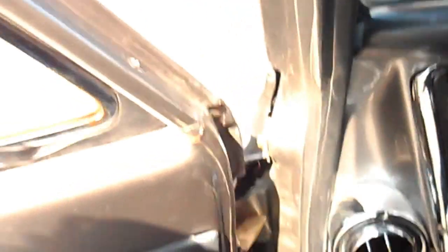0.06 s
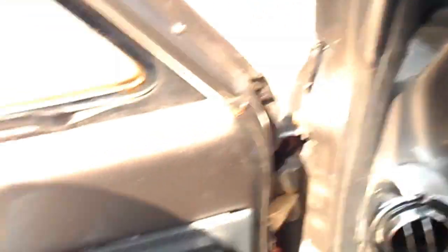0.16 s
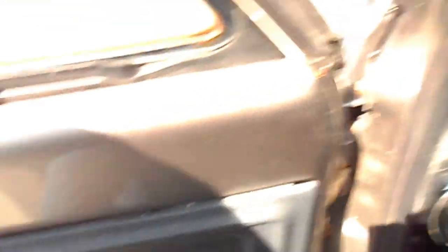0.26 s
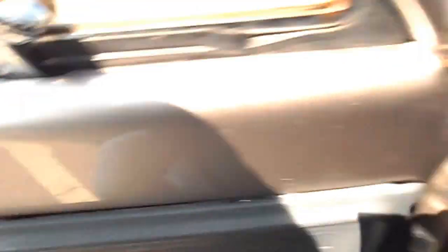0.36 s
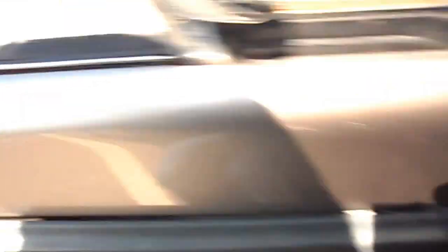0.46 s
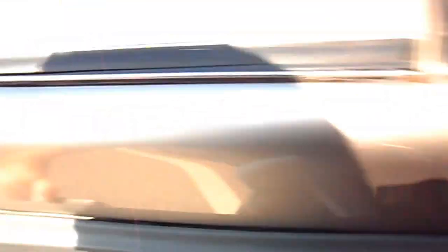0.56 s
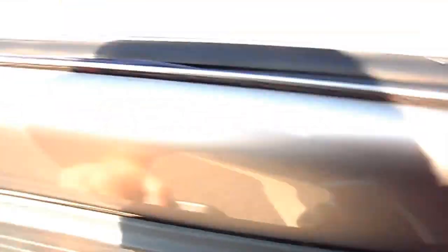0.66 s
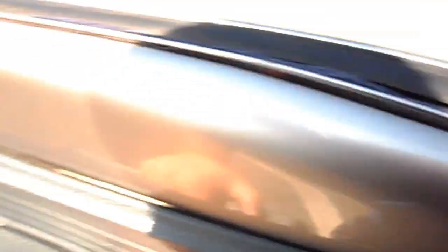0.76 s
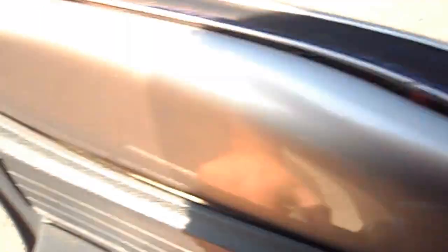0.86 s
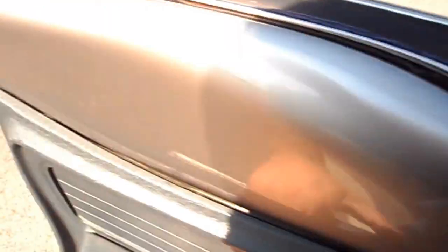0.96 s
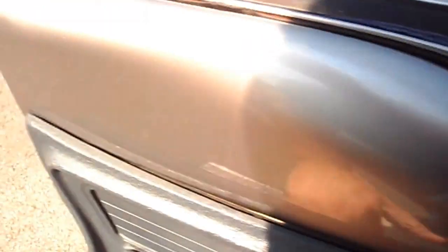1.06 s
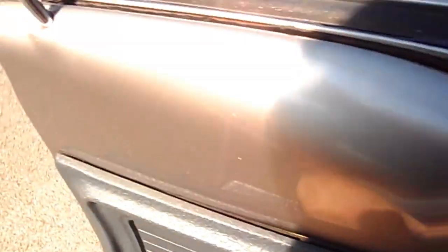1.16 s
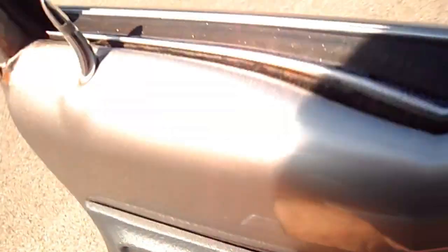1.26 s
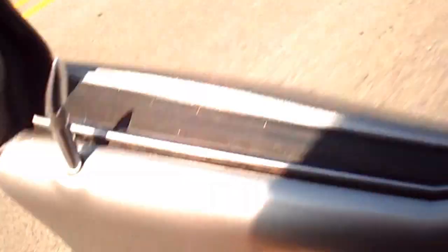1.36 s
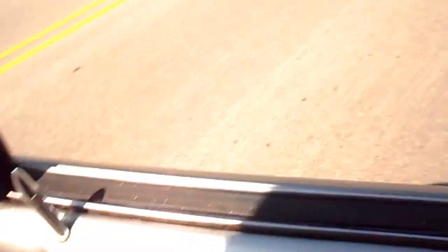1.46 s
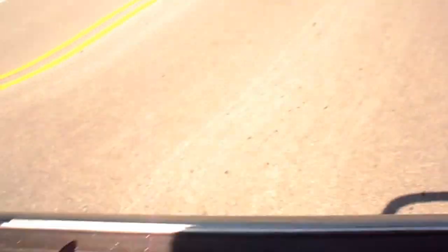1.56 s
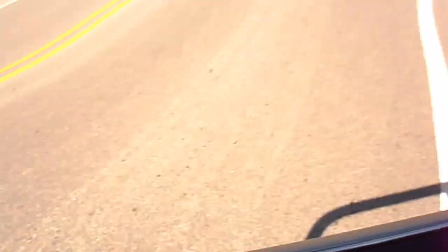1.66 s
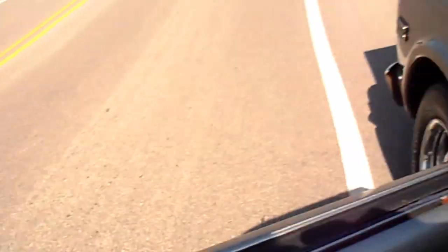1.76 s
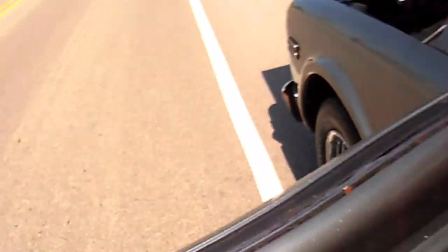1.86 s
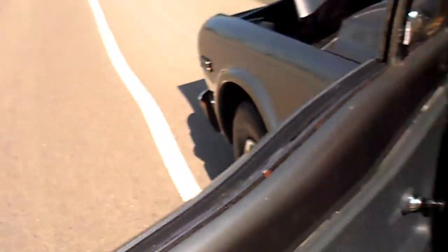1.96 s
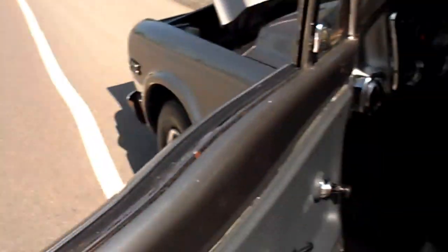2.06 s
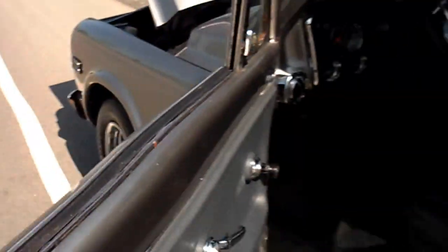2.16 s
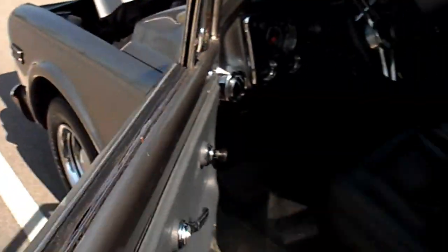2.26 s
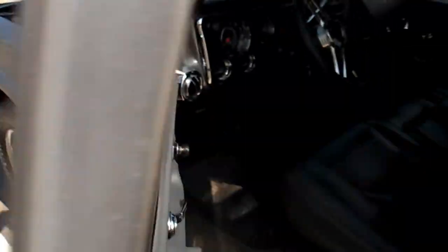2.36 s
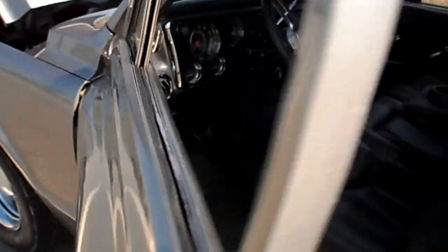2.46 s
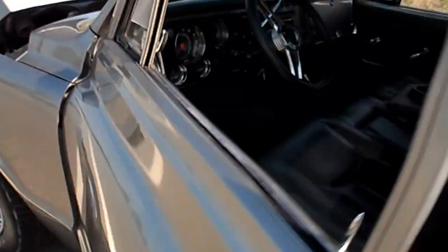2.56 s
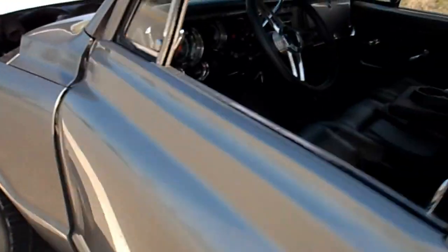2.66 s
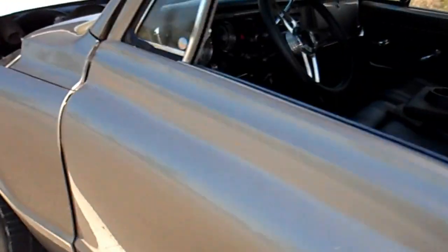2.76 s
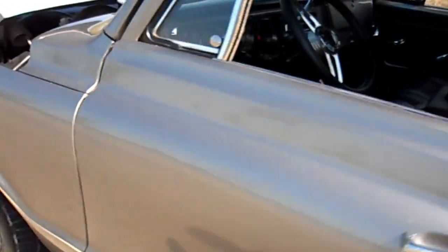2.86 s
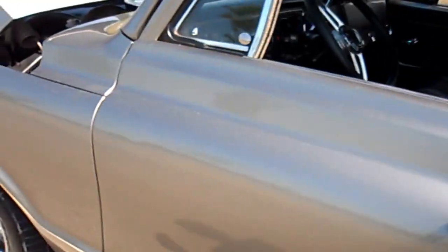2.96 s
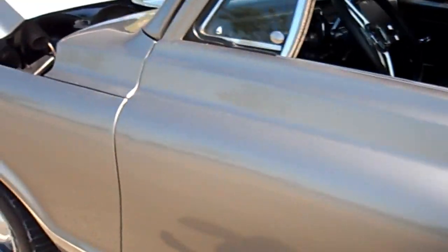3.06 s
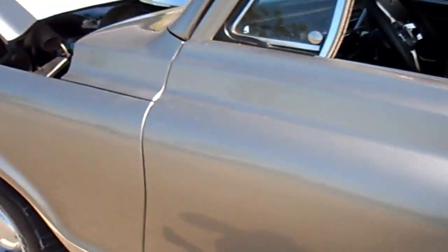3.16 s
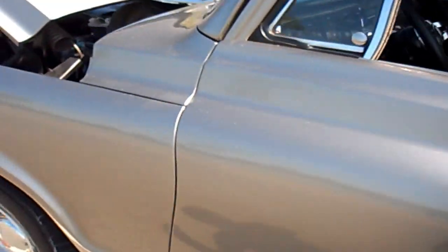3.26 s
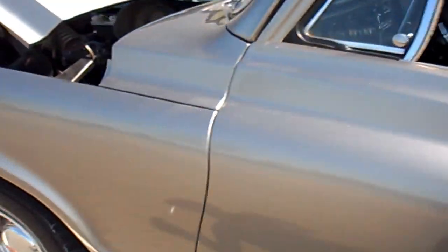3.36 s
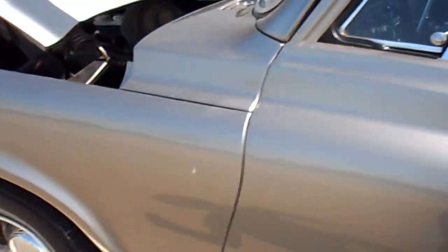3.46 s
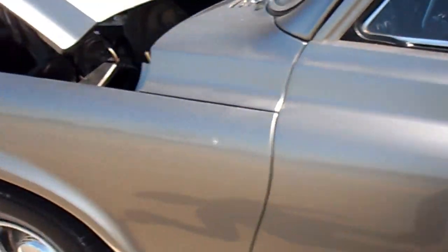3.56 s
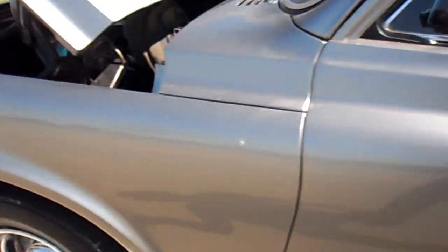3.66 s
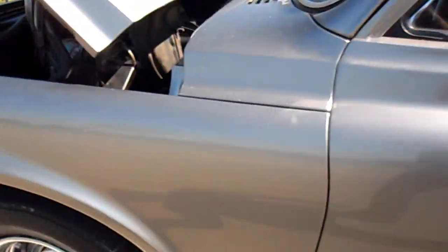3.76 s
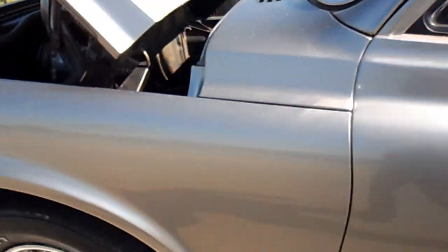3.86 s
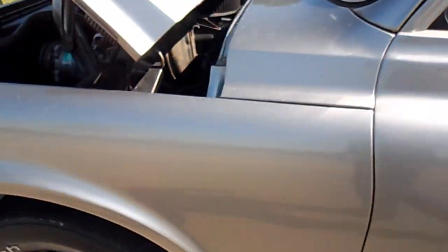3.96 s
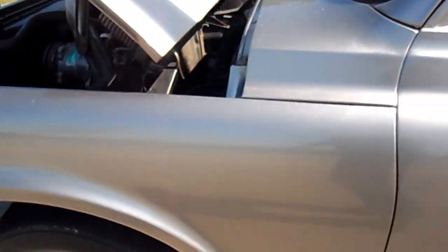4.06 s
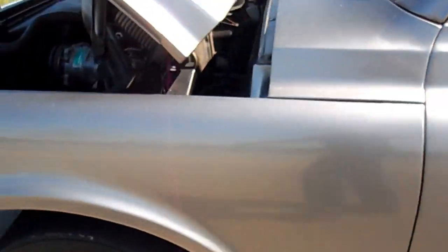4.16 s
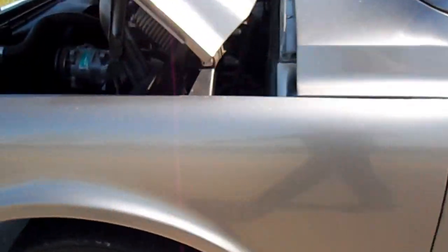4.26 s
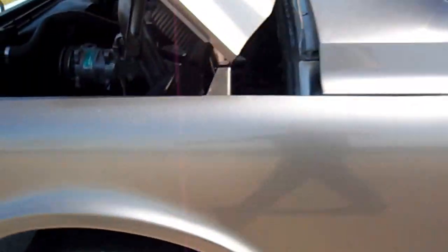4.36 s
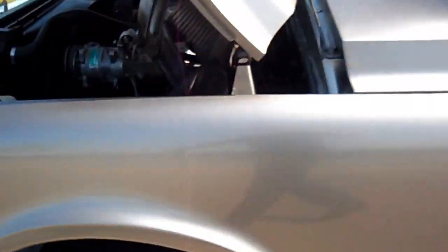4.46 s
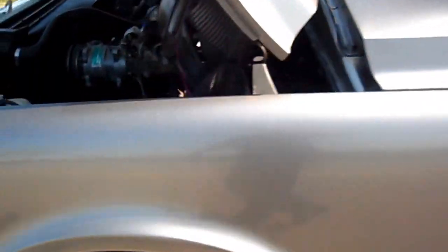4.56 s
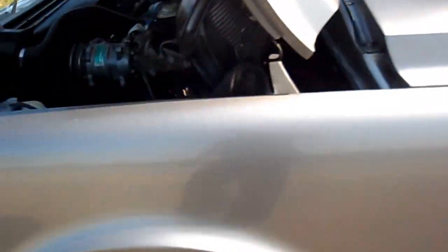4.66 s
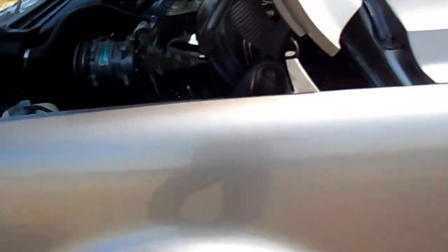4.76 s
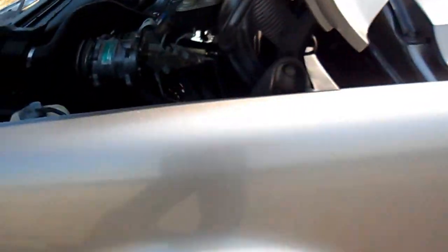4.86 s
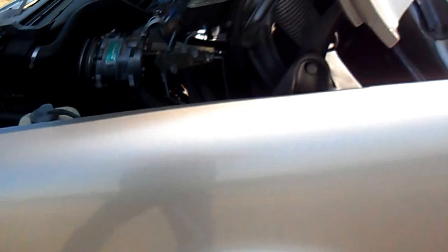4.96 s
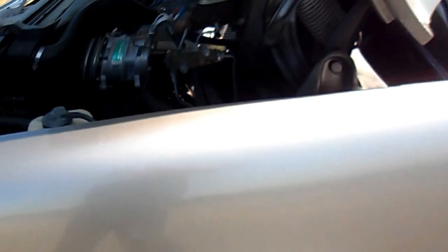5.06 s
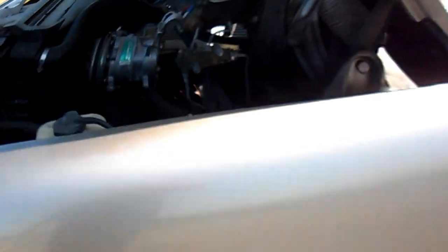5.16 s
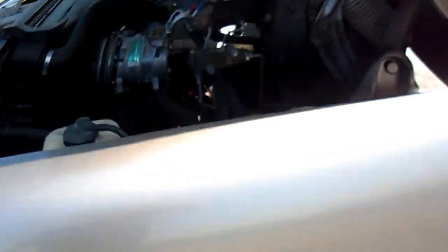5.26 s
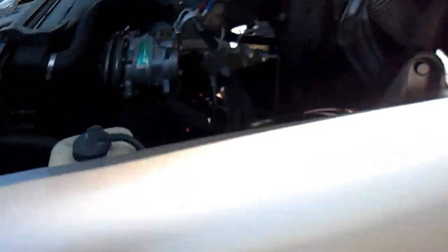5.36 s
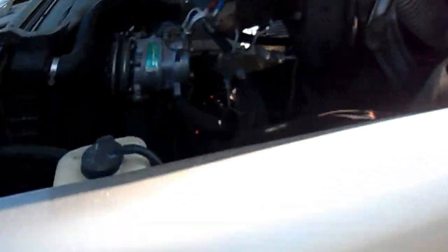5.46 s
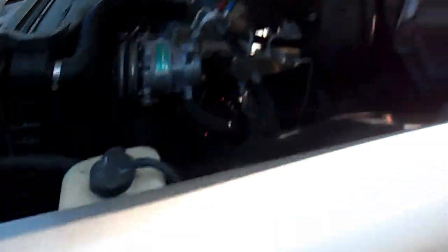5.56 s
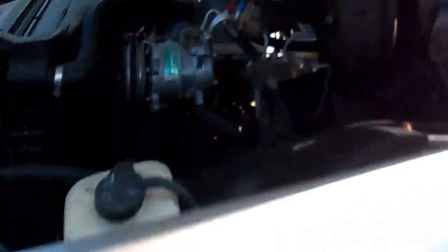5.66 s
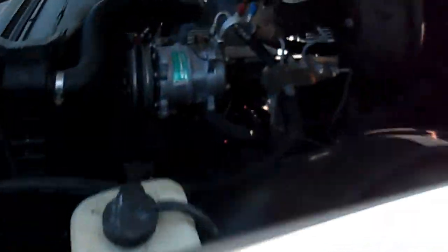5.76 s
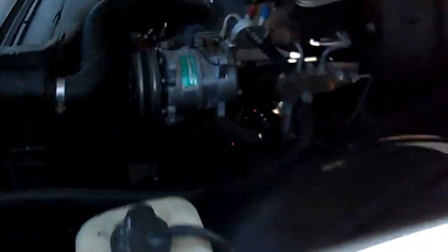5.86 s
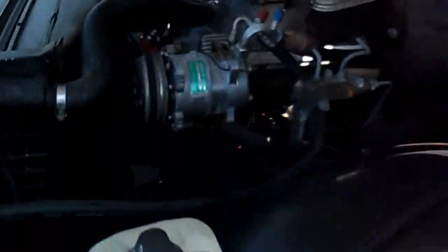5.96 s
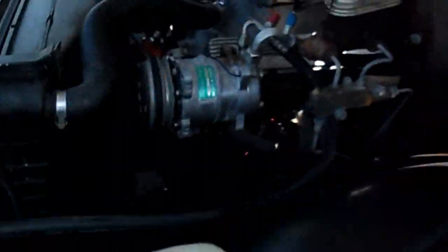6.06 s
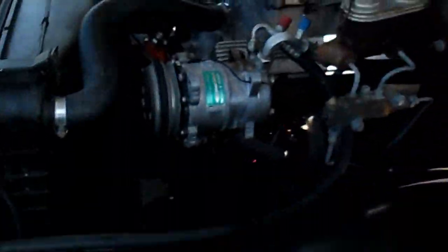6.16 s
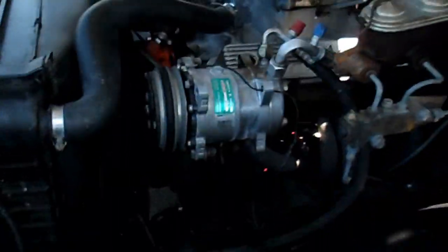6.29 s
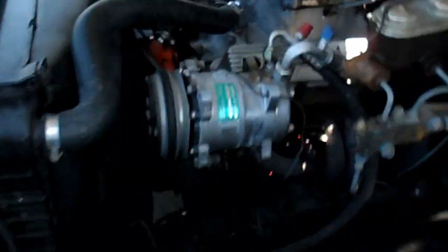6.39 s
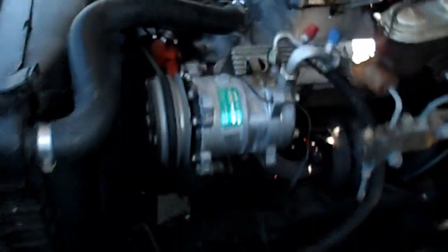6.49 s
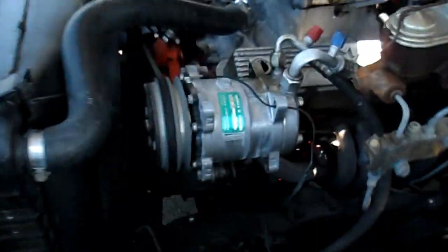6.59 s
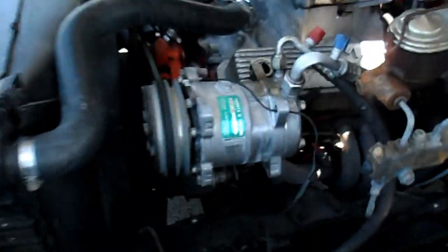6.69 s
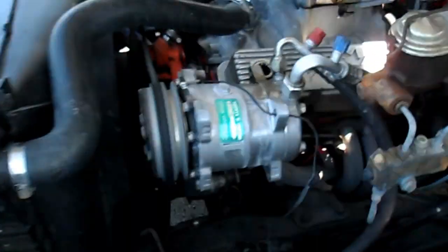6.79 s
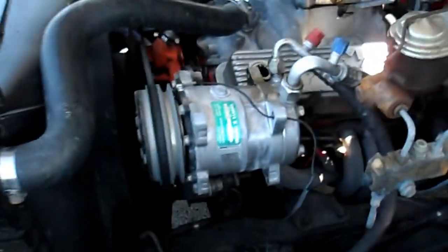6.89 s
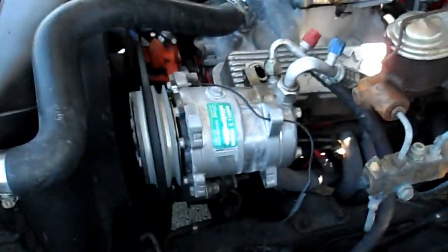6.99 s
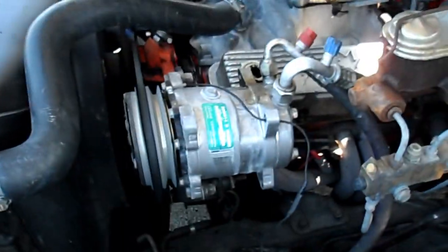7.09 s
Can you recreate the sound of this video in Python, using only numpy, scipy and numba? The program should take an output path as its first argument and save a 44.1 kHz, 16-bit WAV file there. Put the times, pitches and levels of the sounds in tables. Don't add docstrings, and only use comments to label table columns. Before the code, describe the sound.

A V8 pickup idles at the roadside for about seven seconds, around nine uneven eight-beat cycles a second, sagging slightly near 1.3 s and then creeping up. At first, from the cab, its low exhaust burble is boomy and shifting, treble is faint, and wind rumbles; dull gust thumps hit around 0.75 and 1.2 s, with a tiny hinge tick at 1.0. More wind pops come at 2.2 and 2.8. At 3.2 s the door slams: a hard latch crash, ringing sheet metal, a low pump of cab air and brief rattles to 3.4, while the engine ducks and recovers. From 3.2 to 4.1 the microphone walks forward; fan roar, airy hiss, valve ticking, alternator whistle and rapid high belt chirps keep growing, strongest near 6.3. From 6.0 to 6.95 crackling wind blasts pound the microphone, hardest at 6.5, pulling the engine down again.

```python
import sys
import numpy as np
from scipy import signal
from scipy.io import wavfile
from scipy.ndimage import uniform_filter1d
from numba import njit

SR = 44100
rng = np.random.default_rng(int(sys.argv[2]) if len(sys.argv) > 2 else 0)


def wav_out(sig):
    wavfile.write(sys.argv[1], SR, np.round(np.clip(np.atleast_2d(sig).T, -1, 1) * 32767).astype(np.int16))


def nominal_scale(level):
    x = np.asarray(level, float) / 20
    return 10 ** x


N = 314433
T = np.arange(N) / SR

# time [s], speed [cycles/s]
ENGINE_SPEED = [(0, 8.9), (.5, 9.05), (.8, 8.74), (1.2, 8.5), (1.4, 8.49), (2, 8.57), (2.7, 8.64),
                (3.2, 8.65), (3.6, 8.76), (4.2, 8.76), (4.7, 8.83), (5.2, 8.86), (6, 8.93), (7.13, 8.96)]
# time [s], boom [dB], bark_over_boom [dB]
EXHAUST_LEVELS = [(0.0, -19.5, -1), (0.2, -12.5, -22.5), (0.31, -21.5, -11), (0.45, -26, -1),
                  (0.52, -17.5, -10.5), (0.76, -12, -9), (0.84, -16.5, -10), (2.0, -16.5, -7),
                  (3.15, -16, -6.5), (3.6, -14.5, -11.5), (4.6, -16.5, -4.5), (5.9, -18, -6.5),
                  (6.3, -10, -10.5), (6.75, -14, -9.5), (7.13, -22, -11)]
# time [s], nearness [dB], whistle_over_hiss
# [dB]
BAY_LEVELS = [(0.0, -49, -1), (0.3, -51, 0), (1.15, -49.5, 3), (1.35, -48.5, 7), (1.8, -46, 6),
              (2.3, -45, -0.5), (2.75, -44.5, 0.5), (3.15, -42, -2), (3.6, -42, 2.5), (4.2, -39, -1.5),
              (4.6, -37, 4.5), (5.1, -34.5, 1.5), (5.6, -32, 1.5), (5.9, -30.5, -1), (6.08, -29.5, 5),
              (6.3, -28.5, -6), (6.6, -31, -4), (7.13, -34, 2.5)]
# bank [+1/-1], level_at_cab [dB], level_at_bay [dB], manifold_lag [cycles]
CYLINDERS = [(1, 0.8, 0.8, -0.0014), (-1, -0.7, 5.0, -0.0066), (-1, 0.1, -9.1, 0.03),
             (1, 1.3, -2.0, 0.0036), (-1, 0.1, -0.1, 0.0283), (1, 2.5, 3.8, 0.0021), (1, -9.3, 2.0, 0.0241),
             (-1, -1.8, 6.4, -0.002)]
# centre [Hz], width [Hz], level [dB]
BOOM_MODES = [(26.8, 16.5, -15.3), (48.4, 6.1, -25.1), (67.7, 6.1, -12.6), (98.4, 18.4, 2.2),
              (136.8, 12.1, -23.2)]
# centre [Hz], width [Hz], level [dB]
BARK_MODES = [(186.6, 30, -21), (214.8, 13.3, -8.5), (275, 20, -14), (302, 18, -16.5), (385, 36, -26),
              (152, 12, -14)]
# frequency [Hz], density [dB/Hz]
ROAR_SPECTRUM = [(76, -37), (130, 3), (167, -23), (309, -12), (418, -20.5), (717, -15), (2050, -28),
                 (2310, -22), (2500, -47), (3000, -52), (3900, -65), (6600, -120)]
# frequency [Hz], density [dB/Hz]
HISS_SPECTRUM = [(1470, -24), (2500, 1.5), (3430, 2.5), (4350, -6), (5350, 1), (6840, -3), (7620, -8),
                 (12800, -14.5), (15700, -25)]
# centre [Hz], width [Hz], level [dB]
WHISTLE_MODES = [(2290, 73, 0), (2278, 34, 1.5), (2271, 21, -4.5), (2380, 29, -6.5)]
# start [s], peak [dB], pitch [Hz], direction [+1/-1]
POPS = [(0.734, -23, 149, 1), (0.766, -9, 127, 1), (0.8, -12, 230, 1), (0.99, -15, 151, 1),
        (1.188, -5.5, 169, 1), (1.23, -17, 148, 1), (2.218, -6.5, 221, -1), (2.796, -0.5, 187, 1),
        (6.029, -5.5, 304, 1), (6.041, -3, 168, -1), (6.083, -7, 201, 1), (6.246, 1, 154, 1),
        (6.376, -13, 320, 1), (6.38, -5, 151, 1), (6.419, -3, 340, -1), (6.436, -8, 247, -1),
        (6.481, -6.5, 290, -1), (6.5015, -8, 550, 1), (6.5036, 0.5, 380, 1), (6.506, 3.5, 308, -1),
        (6.507, -17, 940, -1), (6.5149, -18, 900, 1), (6.555, -6, 313, 1), (6.631, -6.5, 240, 1),
        (6.644, -12.5, 340, -1), (6.645, -8.5, 580, -1), (6.939, -10.5, 527, -1), (6.94, -6, 198, -1),
        (6.948, -21, 390, 1), (6.958, -9.5, 201, -1)]
# start [s], level [dB], decay_t60 [s]
SLAM_BLOWS = [
    (3.213, -3, 0.17),
    (3.229, -38, 0.05),
    (3.236, -43, .09),
    (3.283, -29, 0.28),
    (3.371, -37.5, 0.059),
]
# frequency [Hz], level [dB], decay_t60 [s]
DOOR_MODES = [(550, 3, 0.23), (900, 5.5, 0.12), (1370, -18, 0.23), (1710, -19, 0.12), (2202, -19, 0.81),
              (2240, -21, 0.19), (3031, -13, 0.16), (3978, -16, 0.15), (4160, 8, 0.14), (5383, -15, 0.12),
              (7391, -17, 0.11), (7700, -11, 0.092)]
# frequency [Hz], density [dB/Hz]
CRASH_SPECTRUM = [(120, -29), (190, 11), (420, -4), (1100, -2.5), (2000, -6.5), (2600, -13), (7290, -21.5),
                  (15700, -37)]
# start [s], first_pitch [Hz], level [dB], length [s]
CABIN_AIR = (3.234, 29, -3.5, .11)
# start [s], level [dB], decay_t60 [s]
HINGE_TICK = (1.011, -30, .012)
# start [s], depth [dB]
DUCKS = [
    (3.22, -4),
    (3.27, -6),
    (3.32, -3),
    (6.033, -7),
    (6.243, -3),
    (6.505, -7.5),
]
# start [s], length [s]
WALK = (3.2, .9)
SLIP_PHASE_TURNS = [.935, .005, .325, .24, .14]
# level_over_hiss [dB], pitch_at_cab [Hz], pitch_at_bay [Hz], slip_length [s]
WORN_SPOTS = [(9.5, 7100, 6650, .015), (2, 7250, 6900, .012), (8.5, 7050, 6550, .016), (6, 5780, 5850, .02),
              (1, 5550, 5500, .015)]
# centre [s], peak [dB], length [s]
GUSTS = [(0.075, -18, 0.62), (0.365, -23, 0.38), (0.736, -15, 0.21), (0.995, -22, 0.16), (1.177, -21, 0.18),
         (2.778, -13, 0.11), (4.33, -22, 0.3), (4.556, -19, .12), (5.62, -17, 0.094), (6.046, -9, 0.079),
         (6.258, -10.5, 0.26), (6.42, -9, .2), (6.623, -19, 0.55), (6.95, -15.5, 0.24)]

ROAR_DB, ROAR_DB_PER_DB = 5.5, -0.2068
SHADED_BELOW_DB, SHADE_DB_PER_DB = -46, .8
BELT_TURNS_PER_CYCLE = .7953
SLIP_SCATTER_DB, SLIP_SCATTER_RATIO, FRAY_DB = 2.5, .025, -11
BREEZE_DB, BREEZE_WANDER_DB = -20.5, 3.5
CRACKLE_DB, CRACKLE_S = -23, 0.0038
ATTACK_S, HOLD_S, RECOVER_S = .012, 0.28, 0.7


def exhaust(cycle):
    boom_db, bark_db = curves(EXHAUST_LEVELS)
    turns = int(cycle[-1]) + 2
    bank, cab_db, bay_db, lag = (np.tile(column, turns) for column in np.transpose(CYLINDERS))
    size_chance, time_chance = rng.standard_normal((len(bank), 2)).T
    fire_cycle = np.arange(len(bank)) / 8 + lag + .0006 * time_chance
    at = np.interp(fire_cycle, cycle, np.arange(N), -1, -1).astype(int)
    fire_db = cab_db + forward(at / SR) * (bay_db - cab_db) + 1.2 * size_chance
    size = (.35 + bank) * nominal_scale(fire_db)
    heard = at >= 0
    pulses = np.full(N, 1e-18)
    pulses[at[heard]] = size[heard]
    turbulence = .016 * rng.standard_normal(N)
    boom = level(resonate(pulses, BOOM_MODES), 1.0)
    bark = level(resonate(pulses + turbulence, BARK_MODES), 0)
    return nominal_scale(boom_db) * (boom + bark * nominal_scale(bark_db))


def bay(cycle):
    hiss_db, whistle_db = curves(BAY_LEVELS)
    roar_db = ROAR_DB + ROAR_DB_PER_DB * (hiss_db + 33)
    puff = 1 + 0.42 * np.exp(-(8 * cycle % 1) / .3)
    roar = coloured(ROAR_SPECTRUM, flicker_db=1.07, rate=39) * puff

    tick_envelope = nominal_scale(1.5 * walk(9)) * np.exp(-((cycle - .03) % 1) / .1)
    tick_envelope = uniform_filter1d(tick_envelope, size=180)
    hiss = coloured(HISS_SPECTRUM, flicker_db=1.5, rate=30)
    tick = level(noise_band(8800.0, 9800.0, 8900.0, 9000.0), -0.21)
    hiss = hiss + tick_envelope * tick * nominal_scale(-.6 * roar_db)
    hiss = level(hiss, 3.23)
    hiss = hiss - (1 - shade(hiss_db)) * svf(hiss, 9700.0, 20000.)

    whistle = resonate(rng.standard_normal(N), WHISTLE_MODES) * nominal_scale(2.2 * walk(25))
    whistle = level(whistle, -0.12) * nominal_scale(whistle_db)
    return nominal_scale(hiss_db) * (hiss + level(roar, 10.8) * nominal_scale(roar_db) + whistle)


def belt(cycle):
    tone, fray = np.zeros(N), np.zeros(N)
    waver = np.clip(walk(220), -2, 2)
    turn = BELT_TURNS_PER_CYCLE * cycle
    for phase, (db, cab_hz, bay_hz, slip_s) in zip(SLIP_PHASE_TURNS, WORN_SPOTS):
        times_s = np.interp(np.arange(1, turn[-1] - 1) + phase, turn, T)
        for s, chance in zip(times_s, rng.standard_normal((60, 4))):
            length_s = slip_s * (1 + 0.33 * np.clip(chance[0], -2, 2))
            start = int((s - length_s / 2 + .0015 * chance[1]) * SR)
            i = start + np.arange(int(length_s * SR))
            i = i[i < N]
            hz = cab_hz + forward(s) * (bay_hz - cab_hz)
            hz = hz * (1 + SLIP_SCATTER_RATIO * chance[2])
            slip = nominal_scale(db + SLIP_SCATTER_DB * chance[3]) * signal.windows.tukey(len(i), .4)
            turns = np.cumsum(hz * (1 + .025 * waver[i])) / SR
            tone[i] += slip * np.sin(2 * np.pi * turns)
            fray[i] += slip
    rough = level(noise_band(6500.0, 2000.0, 6500.0, 2000.0), FRAY_DB)
    hiss = level(svf(rng.standard_normal(N), 9500., 6000.), -25)
    near_db = curves(BAY_LEVELS)[0]
    chirps = tone * nominal_scale(2.5 * walk(400) - 6) + fray * (rough + hiss)
    return nominal_scale(near_db) * shade(near_db) * chirps


def door():
    blows = sum(nominal_scale(db) * decay(s, t60) for s, db, t60 in SLAM_BLOWS)
    crash = coloured(CRASH_SPECTRUM, flicker_db=1.5, rate=150) * blows
    ring = sum(nominal_scale(db - 9) * svf(crash, 1. * hz, 6 / t60) for hz, db, t60 in DOOR_MODES)

    s, hz, db, length_s = CABIN_AIR
    u = np.clip((T - s) / length_s, 0, 1)
    swing = np.sin(2 * np.pi * hz * length_s * (u - .2 * u ** 2))
    air = nominal_scale(db) * swing * (1 - u ** 2)

    s, db, t60 = HINGE_TICK
    hinge = nominal_scale(db) * svf(rng.standard_normal(N), 10000., 10000.) * decay(s, t60)
    return crash + ring + air + hinge


def wind(gain):
    rumble = level(resonate(rng.standard_normal(N), [(28, 20, 0), (48, 30, 0)]), -5)
    flutter = level(noise_band(275.0, 280.0, 280.0, 300.0) * nominal_scale(3.7 * walk(60)), -17.5)
    breeze = nominal_scale(BREEZE_DB + BREEZE_WANDER_DB * walk(6) + 0.52 * gain)
    gusts = 0
    for s, db, length_s in GUSTS:
        gusts = gusts + nominal_scale(db) * np.cos(np.pi * np.clip((T - s) / length_s, -.5, .5)) ** 2
    out = (rumble + flutter) * (breeze + gusts)

    t = T[:SR // 20]
    grit = level(noise_band(520.0, 1110.0, 520.0, 1110.0), CRACKLE_DB)
    crackle = np.exp(1 - t / CRACKLE_S) * t / CRACKLE_S
    for s, db, hz, direction in POPS:
        i = int(s * SR)
        envelope = np.exp(-t * hz / .6) * (1 - np.exp(-t * hz * 9))
        kick = np.sin(2 * np.pi * hz * t) * envelope
        out[i:i + len(t)] += np.sign(direction) * nominal_scale(db + 5) * kick
        out[i:i + len(t)] += nominal_scale(db) * grit[i:i + len(t)] * crackle
    return out


def gain_db():
    gain = 0
    for s, db in DUCKS:
        pull = np.clip((T - s) / ATTACK_S, 0, 1)
        gain = gain + db * pull * np.exp(-np.maximum(T - s - HOLD_S, 0) / RECOVER_S)
    return gain


def forward(s):
    start_s, length_s = WALK
    return np.clip((s - start_s) / length_s, 0, 1)


def shade(near_db):
    return nominal_scale(SHADE_DB_PER_DB * np.minimum(near_db - SHADED_BELOW_DB, 0))


def level(x, db):
    return x * nominal_scale(db) / np.sqrt(np.mean(x ** 2))


def curves(table):
    s, *columns = np.transpose(np.vstack(table))
    return [np.interp(T, s, column) for column in columns]


@njit
def svf(x, hz, width):
    y, band, low = np.empty(len(x)), 0., 0.
    g, k = np.tan(np.pi * hz / SR), width / hz
    for i in range(len(x)):
        v = (band + g * (x[i] - low)) / (1 + g * (g + k))
        band, low, y[i] = 2 * v - band, low + 2 * g * v, k * v
    return y


def noise_band(hz_1, width_1, hz_2, width_2):
    return svf(svf(rng.standard_normal(N), hz_1, width_1), hz_2, width_2)


def resonate(x, modes):
    warm = int(SR / ENGINE_SPEED[0][1])
    x = np.concatenate([x[:warm], x])
    out = 0
    for k, (hz, width_hz, db) in enumerate(modes):
        hz, width = 1. * hz, 1.32 * width_hz
        out = out + (-1) ** k * nominal_scale(db) * svf(svf(x, hz, width), hz, width)
    return out[warm:]


def walk(rate):
    k = int(SR / rate)
    steps = np.repeat(rng.standard_normal(N // k + 1), k)
    return 1.24 * uniform_filter1d(uniform_filter1d(steps, k), k)[:N]


def coloured(spectrum, flicker_db, rate):
    hz, db = np.transpose(spectrum)
    out = 0
    for f in hz[0] * 2 ** np.arange(.25, np.log2(hz[-1] / hz[0]), .5):
        band = noise_band(f, f / 2, f, f / 2)
        band_db = np.interp(np.log(f), np.log(hz), db)
        out = out + band * nominal_scale(band_db + flicker_db * walk(rate))
    return level(out, 0)


def decay(s, t60):
    return (T >= s) * np.exp(-np.log(1000) * np.maximum(T - s, 0) / t60)


def scene():
    cycle = .877 + np.cumsum(curves(ENGINE_SPEED)[0]) / SR
    gain = gain_db()
    engine = exhaust(cycle) + bay(cycle) + belt(cycle)
    return (engine * nominal_scale(gain) + wind(gain) + door())[None]


def top_cut(x):
    return signal.sosfilt(signal.butter(12, 15830, fs=SR, output="sos"), x)


def record(dry):
    x = signal.sosfilt(signal.butter(2, 18, "high", fs=SR, output="sos"), dry)
    x = x / (1 + np.abs(x / .93) ** 5) ** (1 / 5)
    x = signal.sosfilt(signal.ellip(8, .2, 60, 15750, fs=SR, output="sos"), x)
    return top_cut(x)


dry = scene()
out = record(dry)
wav_out(out)
```